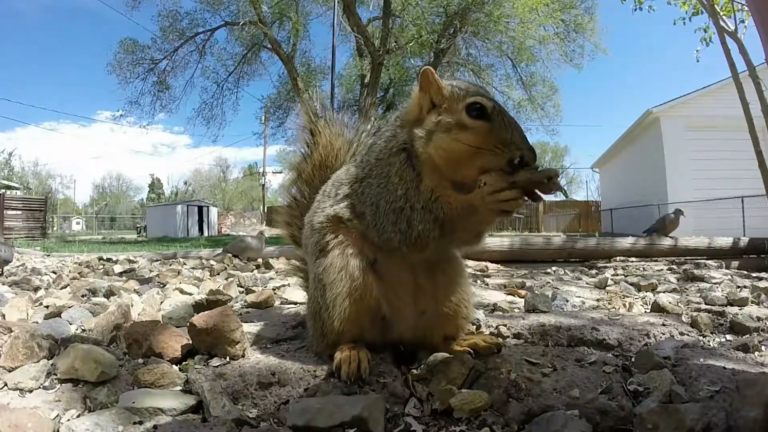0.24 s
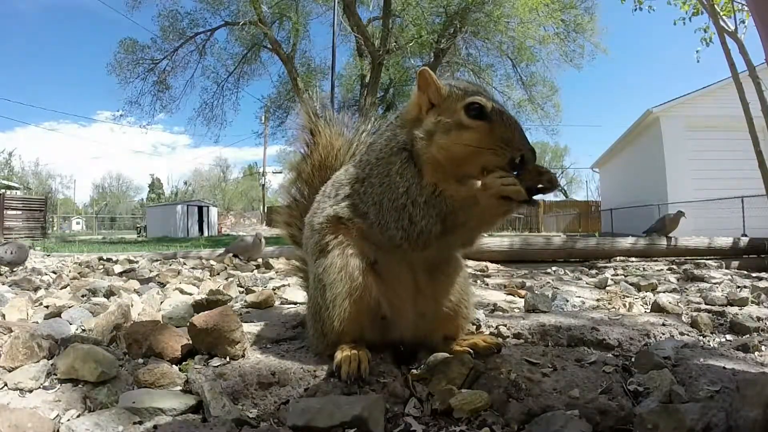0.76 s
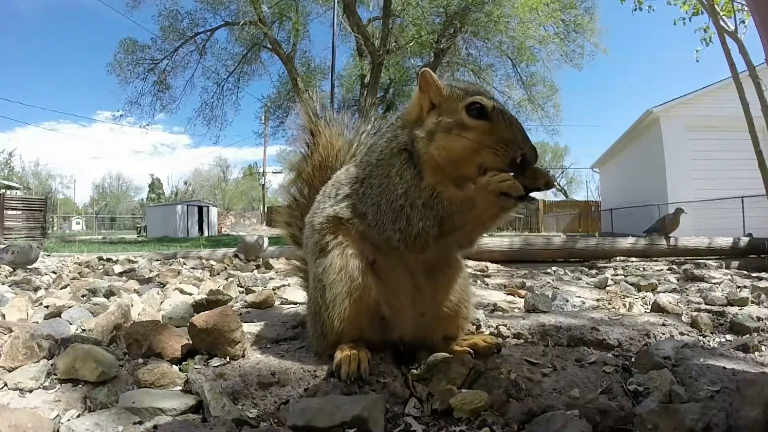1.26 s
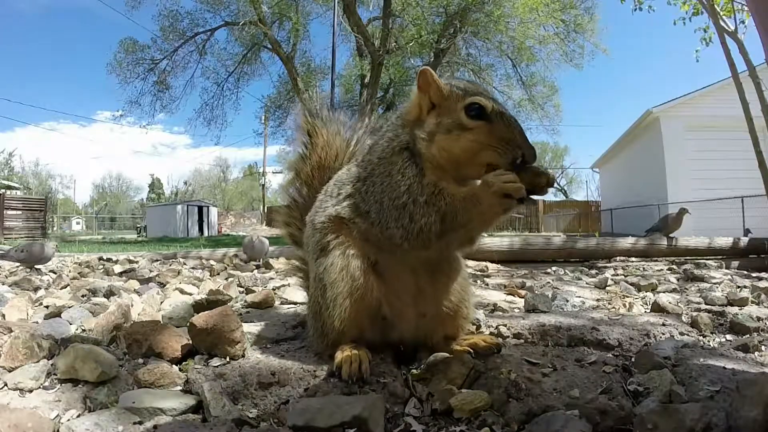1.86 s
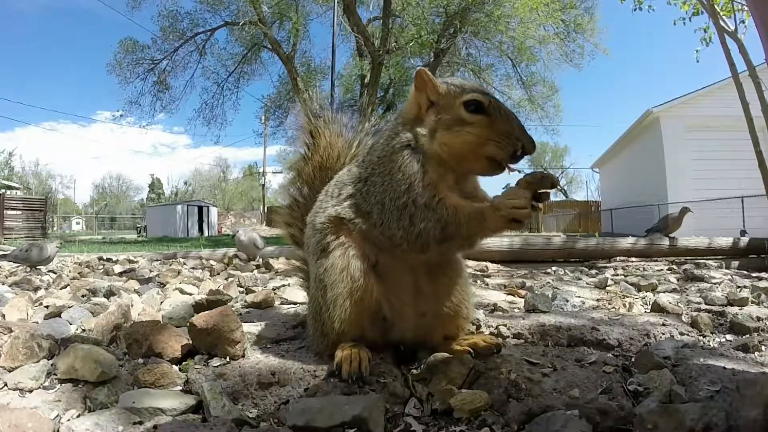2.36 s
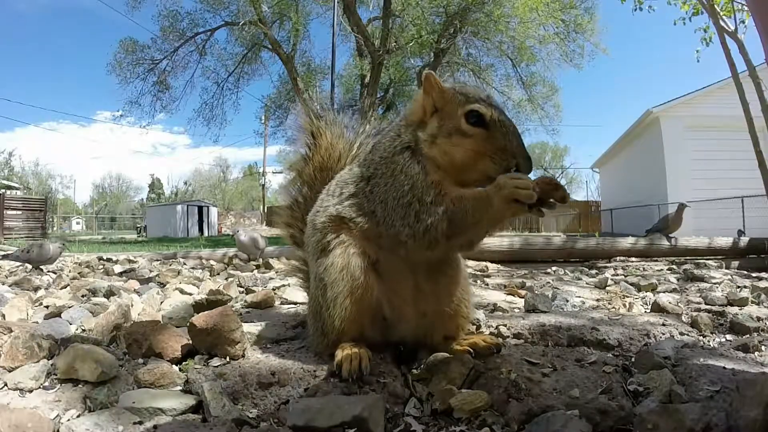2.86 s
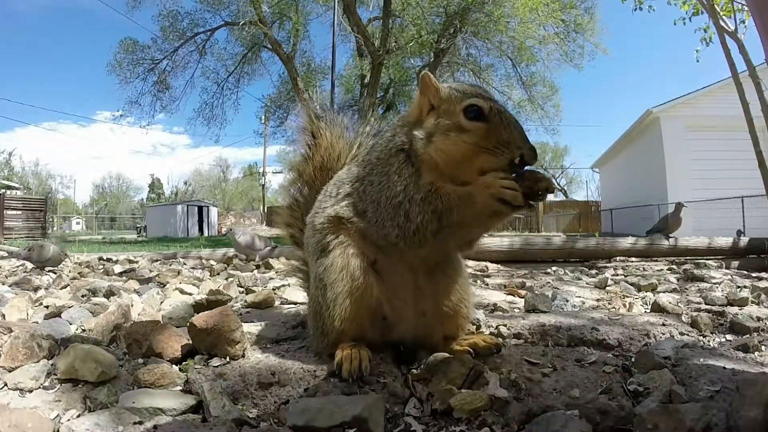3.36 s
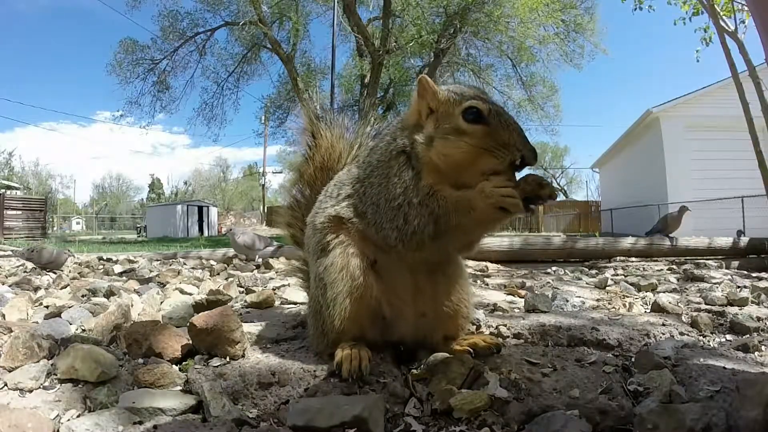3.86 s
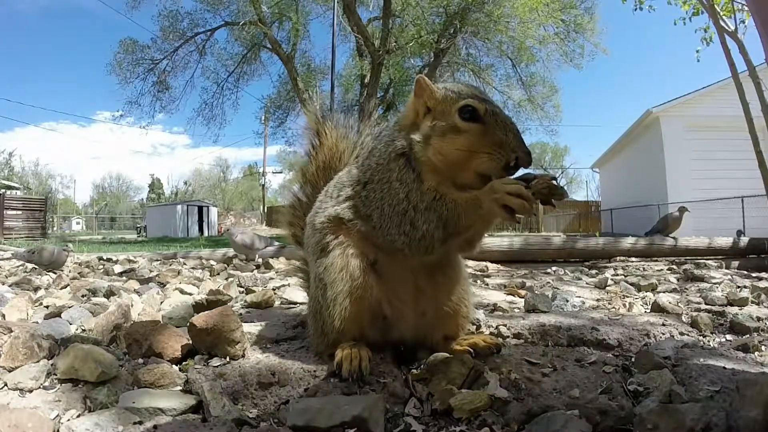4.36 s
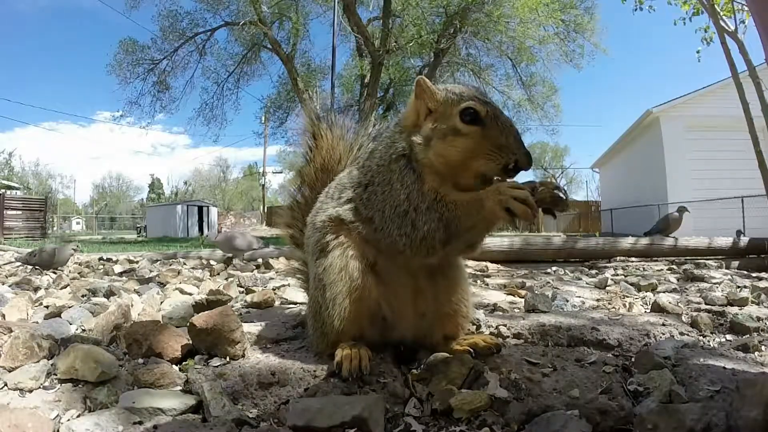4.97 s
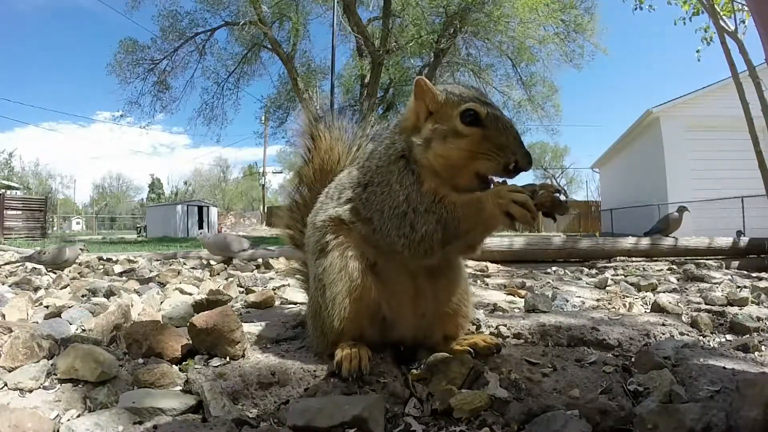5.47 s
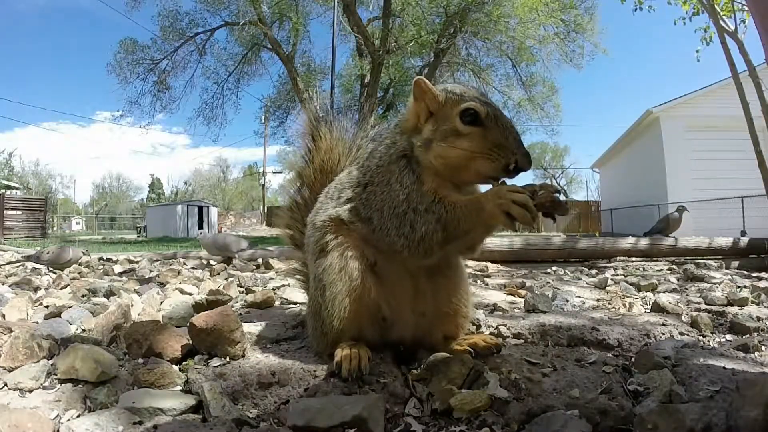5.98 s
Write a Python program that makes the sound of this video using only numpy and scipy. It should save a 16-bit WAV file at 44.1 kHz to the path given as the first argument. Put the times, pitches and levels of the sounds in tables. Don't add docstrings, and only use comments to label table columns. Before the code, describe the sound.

Dry, bright, brittle gnawing in the foreground: rapid tiny clicks, chips snapping off and fine gritty scraping, without bass. It is dense at the start, uneven in the middle and nearly gone by the end. A quiet backyard surrounds it, with faint air and traffic murmur, soft sprinkler pulses repeating about every two thirds of a second, and short distant bird chirps.

```python
import sys
import numpy as np
from scipy import signal
from scipy.fft import rfft, irfft, next_fast_len
from scipy.io import wavfile
from scipy.ndimage import uniform_filter1d

SR = 44100
rng = np.random.default_rng(int(sys.argv[2]) if len(sys.argv) > 2 else 0)


def ratio_of_db(decibels):
    return 10 ** (np.asarray(decibels, float) / 20)


def to_wav(s):
    ch = np.atleast_2d(s).T
    pcm = np.round(np.clip(ch, -1, 1) * 32767)
    wavfile.write(sys.argv[1], SR, pcm.astype(np.int16))


N = 274593


def rms_one(x):
    return x / np.sqrt(np.mean(x ** 2) + 1e-20)


def coloured(spectrum):
    hz, db = np.transpose(spectrum)
    size = next_fast_len(N)
    log_hz = np.log(np.arange(size // 2 + 1) * SR / size + 1)
    gain = ratio_of_db(np.interp(log_hz, np.log(hz), db))
    white = rng.standard_normal(size)
    return rms_one(irfft(rfft(white) * gain, size)[:N])


# frequency in Hz, level in dB per Hz.
YARD_SPECTRUM = [(9, -17), (15, -2.5), (50, -2), (130, -4), (220, -7), (460, -12.5), (1020, -18.5),
                 (2180, -23), (4650, -28), (7800, -35), (8700, -34), (9600, -37.5), (14300, -42.5),
                 (15600, -49.5)]


def yard():
    yard_db = -56
    return ratio_of_db(yard_db) * coloured(YARD_SPECTRUM)


def ring(clicks, hz, t60):
    radius = ratio_of_db(-60 / (t60 * SR))
    turn = 2 * np.pi * hz / SR
    return signal.lfilter([0, np.sin(turn)], [1, -2 * radius * np.cos(turn), radius * radius], clicks + 1e-18)


def fracture(x, hz, width_hz):
    radius = np.exp(-np.pi * width_hz / SR)
    b = (1 - radius * radius) / 2 * np.array([1, 0, -1])
    a = [1, -2 * radius * np.cos(2 * np.pi * hz / SR), radius * radius]
    return signal.lfilter(b, a, signal.lfilter(b, a, x))


def family(modes, at, level_db, scatter_db, crumble_s):
    chance = rng.standard_normal((len(at), len(modes)))
    late = rng.random((len(at), len(modes)))
    out = 0
    for k, (hz, mode_db, t60) in enumerate(modes):
        clicks = np.zeros(N + SR)
        struck_at = at + (late[:, k] * crumble_s * SR).astype(int)
        np.add.at(clicks, struck_at, ratio_of_db(level_db + mode_db + scatter_db * chance[:, k]))
        out = out + ring(clicks[:N], hz, t60)
    return out


# frequency in Hz, level in dB, fading time (t60) in seconds.
HOLLOW_MODES = [(2670, -4, 0.011), (2975, -4.5, 0.0141), (3262.6, 1, 0.0171), (3520, -1, 0.0169),
                (3750, -6, 0.021)]
BODY_MODES = [(4400, -19, 0.00907), (4562.6, 0.5, 0.01306), (4950, -15.5, 0.0043), (5210, 10.5, 0.00437)]
UPPER_MODES = [(5580, 1.5, 0.0185), (5986, -1.5, 0.0205), (6356, -2.5, 0.0116), (6938, 2.5, 0.0104),
               (7320, 3.5, 0.006)]
SPLINTER_MODES = [(8250, 6, 0.0058), (9000, 2.5, 0.005), (9544, -2, 0.0079), (10690, 4.5, 0.0048),
                  (10900, -6.5, 0.006), (11960, 6, 0.00574), (13640, 10, 0.0042), (15050, 3, 0.0044)]


def shell(at, level_db, hollow_db, upper_db, bright_db, scatter_db):
    crumble_s = np.clip(-(level_db + 42) * .00018, 0, .004)
    splinter_spread_s = .0013
    hollow = family(HOLLOW_MODES, at, level_db + hollow_db - .2, scatter_db, crumble_s)
    body = family(BODY_MODES, at, level_db - .1, scatter_db, crumble_s)
    upper = family(UPPER_MODES, at, level_db + upper_db - 3.0, scatter_db, crumble_s + .0004)
    bright = family(SPLINTER_MODES, at, level_db + bright_db - 4.0, scatter_db, crumble_s + splinter_spread_s)
    low = fracture(hollow, 3306, 1220) - fracture(body, 4621, 1037)
    return low + fracture(upper, 6016, 2620) - fracture(bright, 8940, 7970)


# time in seconds, level in dB.
SCRAPE_LEVEL = [(0.0, -67.5), (0.13, -70.5), (0.37, -67), (0.49, -73.5), (0.71, -75.5), (1.11, -78),
                (1.29, -70), (1.5, -68.5), (1.83, -78), (2.18, -69.5), (2.43, -74.5), (2.78, -87),
                (3.07, -72.5), (3.2, -71), (3.56, -71), (4.0, -80.5)]


def scraping(per_s=640.0):
    at = np.flatnonzero(rng.random(N) < per_s / SR)
    s, db = np.transpose(SCRAPE_LEVEL)
    uneven_db = 4.54 * np.minimum(rng.exponential(1, len(at)), 4)
    level_db = np.interp(at / SR, s, db, right=-120) - 10.0 + uneven_db
    return shell(at, level_db, -16.0, -2.8, -17.5, scatter_db=3.0)


# first spit in seconds, gap between spits in seconds, level in dB.
BURSTS = [(0.009, 0.108, -73.5), (0.444, 0.0422, -67), (1.155, 0.0201, -69), (1.773, 0.075, -67),
          (2.452, 0.0387, -66.5), (3.122, 0.0383, -69.5), (3.775, 0.0717, -67.5), (4.443, 0.0384, -69),
          (5.13, 0.0352, -70), (5.755, 0.045, -68)]
SPIT_DB = [1.63, 1.77, 0.5, -11.5]
# time in seconds, level in dB.
STRAY_SPITS = [(0.632, -73.5), (3.241, -68.5), (3.498, -69.5), (4.424, -70), (4.613, -69), (5.049, -68.5),
               (5.246, -71.5), (5.776, -75.5), (5.91, -64)]
# frequency in Hz, level in dB per Hz.
SPRAY_SPECTRUM = [(500, -15), (1150, 13), (2000, 3.5), (7500, -7.5), (9000, 1.5), (12000, -3),
                  (14500, -5.5), (16000, -19.5)]
SPLASH_SPECTRUM = [(400, -28.5), (700, 11.5), (1150, 8), (1900, -5.5), (5000, -12), (7500, -24)]


def sprinkler(width_s=0.01103):
    t = np.arange(N) / SR
    puffs = np.zeros(N)
    for s, gap, db in BURSTS:
        for k, spit_db in enumerate(SPIT_DB):
            puffs += ratio_of_db(db + 0.5 + spit_db) * np.exp(-((t - s - k * gap) / width_s) ** 2 * 2)
    for s, db in STRAY_SPITS:
        puffs += ratio_of_db(db) * np.exp(-((t - s) / width_s) ** 2 * 2)
    hiss = puffs * coloured(SPRAY_SPECTRUM)
    landing = ratio_of_db(4.0) * uniform_filter1d(puffs, size=1500)
    return hiss + landing * coloured(SPLASH_SPECTRUM)


# time in seconds, level in dB, upper
# modes in dB against that level.
NIBBLES = [(0.0385, -58.5, -17.5), (0.1438, -57, -16.5), (0.1964, -62, -8.5), (0.2164, -55, -2.5),
           (0.3105, -59.5, -16), (0.4119, -59, -10.5), (0.5342, -54, -14), (0.5587, -59, -3),
           (0.6182, -56.5, -2), (0.7014, -54.5, -8.5), (0.8776, -52, -18.5), (0.9783, -61.5, 1),
           (1.2752, -62, -7), (1.3533, -56.5, -2), (1.369, -54, -4), (1.4451, -54, -2.5),
           (1.4981, -62.5, -9), (1.5699, -60.5, -10.5), (1.9309, -56, -17), (2.2798, -57, -10),
           (2.31, -53, -7), (2.6432, -56, -13.5), (2.6577, -58.5, -13.5), (3.21, -58.5, -4),
           (3.3353, -64, 1.5), (3.5517, -60.5, -4), (3.6723, -57, -4.5), (3.7353, -58.5, -1),
           (3.9366, -60, -3), (4.8299, -59, -14)]
MORE_NIBBLES = [(3.1974, -58.5, -6.5), (3.278, -59.5, 0), (3.5318, -65.5, -8), (3.5665, -65.5, 2.5),
                (3.6986, -66, -7.5), (4.6791, -65.5, 4), (4.8574, -62, 2.5), (4.89, -62, -14.5),
                (5.55, -64, -15), (5.84, -65, -15), (6.1031, -63.5, -7.5)]


def nibbles():
    s, level_db, upper_db = np.transpose(list(NIBBLES) + list(MORE_NIBBLES))
    at = np.round(s * SR).astype(int)
    return shell(at, level_db, -9.0, upper_db, -20.5, scatter_db=3.5)


# start in seconds, length in seconds, level in dB.
RASPS = [(0.04, .03, -70), (0.874, 0.0226, -62), (1.035, 0.0286, -62), (1.513, 0.026, -56.5),
         (2.215, 0.0186, -56.5), (2.261, 0.0198, -54.5), (2.306, 0.0186, -56.5), (2.363, .02, -55),
         (3.547, 0.0254, -66.5), (3.662, 0.02, -63), (3.901, 0.029, -61.5)]


def rasping(per_s=770.0):
    at = np.flatnonzero(rng.random(N) < per_s / SR)
    level_db = np.full(len(at), -140.)
    for s, length, db in RASPS:
        level_db[(at > s * SR) & (at < (s + length) * SR)] = db - 7.0
    return shell(at, level_db, -6.0, -3.5, -28.5, scatter_db=1.5)


# time in seconds, level in dB, then hollow modes, upper modes
# and bright splinters, each in dB against that level.
CRACKS = [(0.17, -38, -13, -10.5, -33.5), (0.279, -42, -13.5, -5, -23.5), (0.2854, -42, -14.5, -9.5, -27.5),
          (0.2903, -38, -17, -7.5, -27.5), (0.3337, -44, -16, -12.5, -27), (0.3673, -33, -5, -5.5, -22.5),
          (0.3746, -13, -14, -10.5, -22.5), (0.7112, -22, -19.5, -12, -25), (0.756, -33.5, -5.5, 0, -18),
          (0.7695, -26.5, -6, -11.5, -19.5), (0.9442, -37.5, -7.5, -7.5, -19.5),
          (1.376, -42.5, -10.5, -2, -21), (1.6239, -46.5, -9.5, -3, -17), (1.6739, -41.5, -10.5, -1.5, -13),
          (2.024, -58, 1.5, 13, 0), (2.1639, -41.5, -13.5, -1, -23.5), (2.167, -34.5, -4, 3.5, -10),
          (2.3839, -42, -5.5, -5, -17.5), (2.3875, -36, -9, 1.5, -12.5), (2.632, -43.5, -7.5, 0, -7),
          (2.6943, -35.5, -16, 2, -17), (3.411, -49.5, -12, 2, -9.5), (3.4568, -48.5, -12.5, -2.5, -13.5),
          (3.788, -50.5, -4, 1.5, -11.5)]
# time in seconds, level in dB, upper modes in dB against that level.
FIRST_BITES = [(0.049, -54.5, -24), (0.054, -47.5, -20), (0.06, -49, -21), (0.0656, -48.5, -26),
               (0.1615, -45.5, -7), (0.1876, -54, -14), (0.2016, -48.5, -21), (0.2075, -53, -20.5),
               (0.2285, -51.5, -19), (0.2626, -70.5, -22), (0.2683, -43.5, -16), (0.2742, -58.5, -10.5),
               (0.299, -43, -9), (0.391, -52, -2), (0.4, -51.5, -1.5), (0.4175, -57.5, -16),
               (0.428, -54, -1), (0.4444, -56, -6.5), (0.4842, -55.5, -20.5), (0.491, -57.5, -18.5),
               (0.4979, -52, -29), (0.5019, -56, -8), (0.538, -51.5, -18.5), (0.6006, -59, -6),
               (0.6886, -50, -13), (0.7051, -53.5, -9.5)]
LATER_BITES = [(1.345, -47.5, -11.5), (1.4062, -47.5, -3), (1.4724, -53, -5.5), (1.517, -48.5, -18.5),
               (1.527, -48.5, -7), (1.5314, -54, -9.5), (1.7897, -57.5, -5), (1.8304, -51.5, -14.5),
               (1.9496, -52, -1), (1.9907, -47.5, -5), (2.0307, -48.5, -12.5), (2.0915, -48, -7),
               (2.1598, -54.5, -7), (2.221, -49.5, -14), (2.2263, -53.5, -14), (2.2713, -51, -14),
               (2.3146, -46, -13), (2.3212, -54.5, -12.5), (2.3694, -57, -7.5), (2.614, -54, 1),
               (2.7273, -52.5, -8), (3.087, -53.5, -3.5), (3.135, -53, -11.5), (3.282, -51, -2),
               (3.4205, -47.5, 1.5), (3.5969, -52.5, -9), (3.7236, -55.5, 1), (3.909, -52.5, -3.5),
               (3.919, -53, -11), (3.928, -50, -8.5)]


def all_snaps():
    cracks = np.array(CRACKS)
    crumb_late_s, crumb_loss_db, crumb_top_db = .0046, 8.5, -54
    crumbs = cracks + [crumb_late_s, 0, 0, 0, 0]
    crumbs[:, 1] = np.minimum(cracks[:, 1] - crumb_loss_db, crumb_top_db)
    whole_hollow_db, opened_hollow_db = -17.5, -11
    bites = []
    for rows, hollow_db in [(FIRST_BITES, whole_hollow_db), (LATER_BITES, opened_hollow_db)]:
        for s, db, upper_db in rows:
            bright_db = -15 + .35 * upper_db
            bites.append((s, db, hollow_db, upper_db, bright_db))
    return np.vstack([cracks, crumbs, bites]).T


def snaps():
    s, *levels = all_snaps()
    return shell(np.round(s * SR).astype(int), *levels, scatter_db=2.6)


# frequency in Hz, level in dB, fading time (t60) in seconds.
KNOCK_MODES = [(1600, -35.5, 0.0094), (2075, -38, 0.0089)]


def knock():
    s, level_db, hollow_db = all_snaps()[:3]
    clicks = np.zeros(N)
    clicks[np.round(s * SR).astype(int)] = ratio_of_db(level_db + hollow_db + 12.5)
    thud = sum(ratio_of_db(db) * ring(clicks, hz, t60) for hz, db, t60 in KNOCK_MODES)
    return fracture(thud, 1900, 1200)


def stones(x):
    dull = signal.lfilter([.6], [1, -.4], x)
    out = x.copy()
    for lag_s, db in [(.0026, -15), (.0047, -14), (.0071, -27), (.0112, -30.5), (.0155, -38)]:
        lag = round(lag_s * SR)
        out[lag:] += ratio_of_db(db) * dull[:-lag]
    return out


# start in seconds, length in seconds, start pitch in Hz,
# end pitch in Hz, level in dB.
CHIRPS = [(.875, 0.063, 3620, 3520, -71.5), (1.016, 0.065, 3600, 3560, -74),
          (2.309, 0.0216, 3540, 3415, -64.5), (2.992, 0.0135, 3800, 3575, -72),
          (3.025, .018, 5800, 6220, -73), (3.035, .015, 4450, 4410, -74.5),
          (3.253, 0.02, 3490, 3450, -69.5), (3.271, .02, 3600, 3780, -68), (3.304, 0.0114, 3880, 3590, -70),
          (4.132, 0.0216, 4680, 4450, -72), (4.207, 0.0086, 7050, 6930, -69),
          (4.294, 0.0317, 4700, 4545, -71.5), (4.313, 0.0156, 3800, 3580, -66),
          (4.327, 0.0117, 3520, 3450, -76), (4.441, 0.0194, 3670, 3750, -70.5),
          (4.467, 0.0217, 4500, 4400, -69.5), (4.478, 0.0206, 3780, 3652, -65),
          (4.486, 0.0263, 3500, 3258, -72.5), (5.162, 0.0156, 3250, 3350, -72),
          (5.201, 0.059, 3250, 3280, -77.5), (5.175, 0.057, 3750, 3890, -73), (5.53, .035, 6600, 6100, -78),
          (5.797, 0.059, 3400, 3446, -74.5), (5.975, 0.051, 3500, 3426, -73)]


def sparrows(blur_hz=230.):
    out = np.zeros(N)
    for s, length, start_hz, end_hz, db in CHIRPS:
        n = round(length * SR)
        phase = 2 * np.pi * np.cumsum(np.linspace(start_hz, end_hz, n)) / SR
        out[round(s * SR):][:n] += ratio_of_db(db + 6.5) * np.hanning(n) ** 0.226 * np.sin(phase)
    slow = signal.butter(2, blur_hz, fs=SR, output="sos")
    leaves = rms_one(signal.sosfilt(slow, rng.standard_normal(N)))
    out = out * (.8 + .55 * leaves)
    tail_n = round(.12 * SR)
    tail = rng.standard_normal(tail_n) * ratio_of_db(-60 * np.arange(tail_n) / SR / 0.53)
    return out + ratio_of_db(-40) * signal.fftconvolve(out, tail)[:N]


def scene():
    teeth = snaps() + nibbles() + scraping() + rasping()
    no_bass = signal.butter(2, 2300, "high", fs=SR, output="sos")
    nut = stones(signal.sosfilt(no_bass, teeth)) + knock()
    return (nut + sprinkler() + sparrows() + yard())[None]


def roll_off(x):
    return signal.sosfilt(signal.butter(12, 15250, fs=SR, output="sos"), x)


def record(dry):
    size = next_fast_len(N)
    hz = np.arange(size // 2 + 1) * SR / size
    top = irfft(rfft(dry, size) * (hz > 13000), size)[:, :N]
    t = np.arange(N) / SR
    before_s, after_s = .03, .014
    near_crack = np.zeros(N, bool)
    for s in np.transpose(CRACKS)[0]:
        near_crack |= (t > s - before_s) & (t < s + after_s)
    faint = uniform_filter1d(top[0] ** 2, size=128) < ratio_of_db(-77) ** 2
    lost = uniform_filter1d((near_crack & faint) * 1., size=96)
    return roll_off(dry - top * lost)


dry = scene()
out = record(dry)
to_wav(out)
```